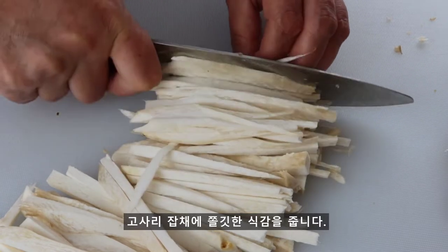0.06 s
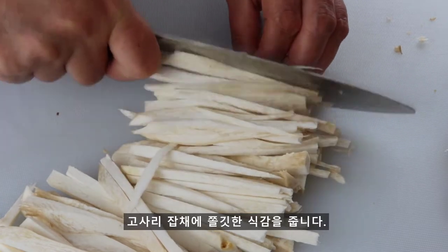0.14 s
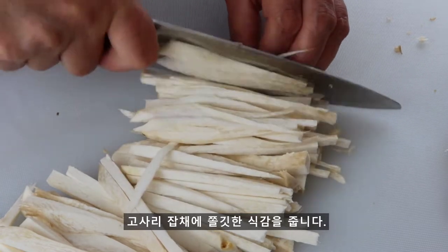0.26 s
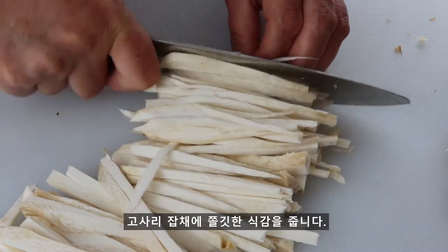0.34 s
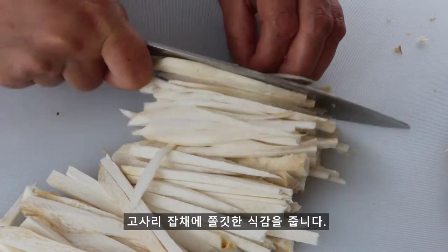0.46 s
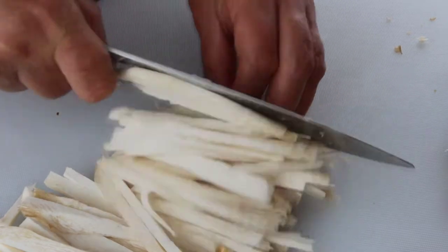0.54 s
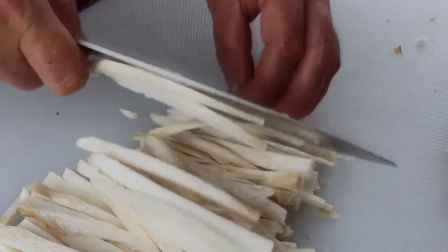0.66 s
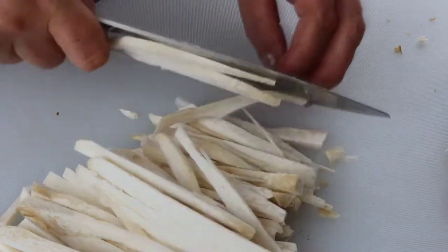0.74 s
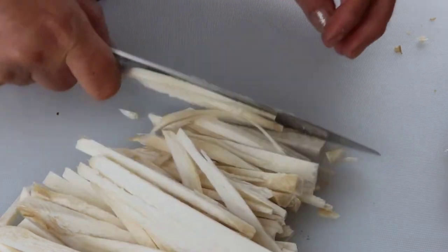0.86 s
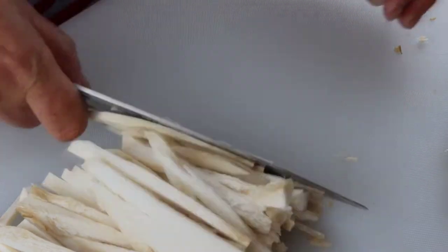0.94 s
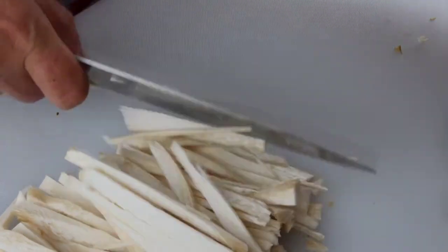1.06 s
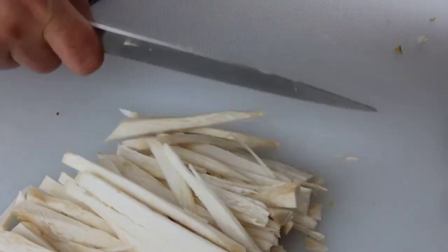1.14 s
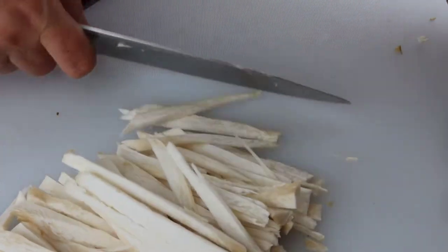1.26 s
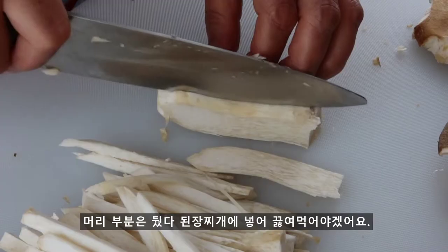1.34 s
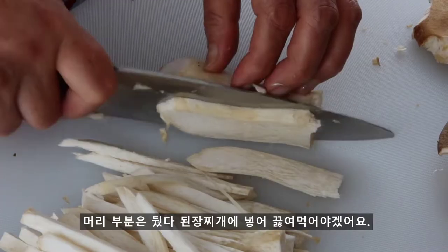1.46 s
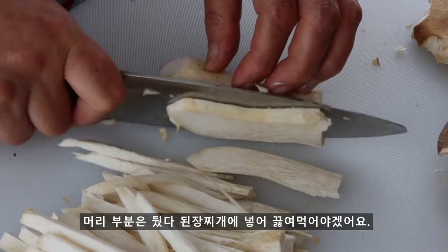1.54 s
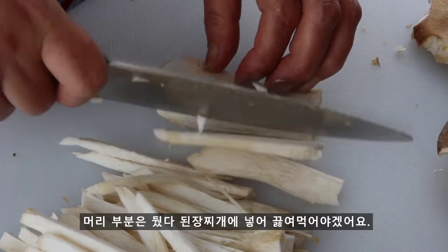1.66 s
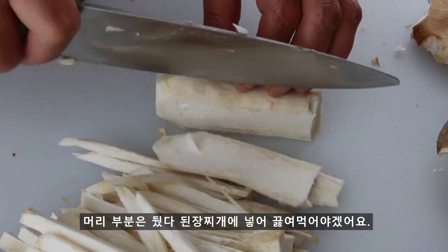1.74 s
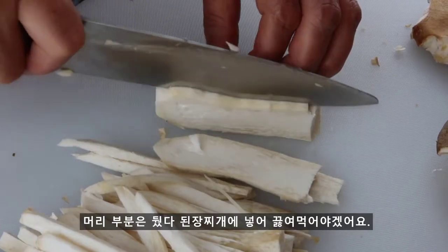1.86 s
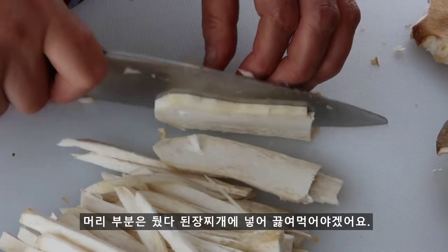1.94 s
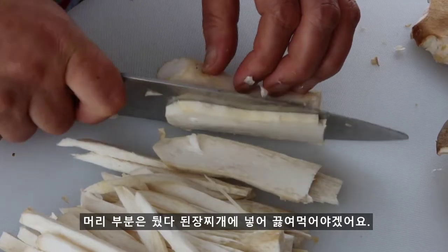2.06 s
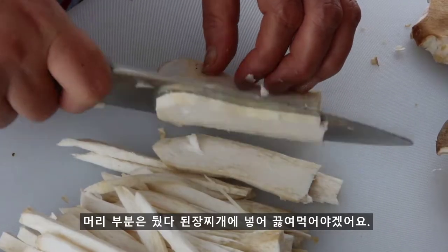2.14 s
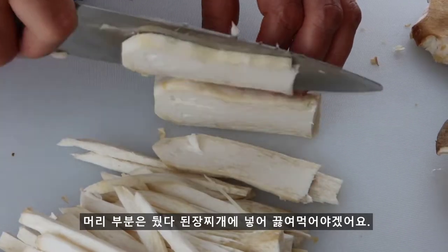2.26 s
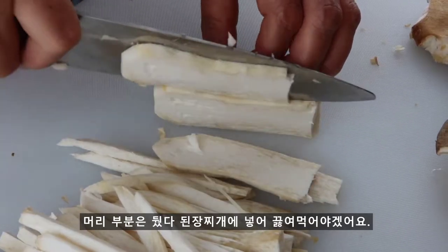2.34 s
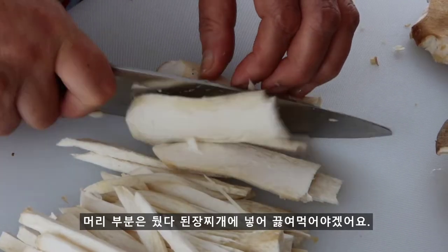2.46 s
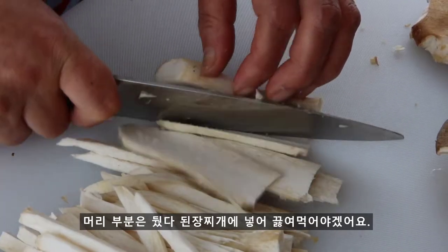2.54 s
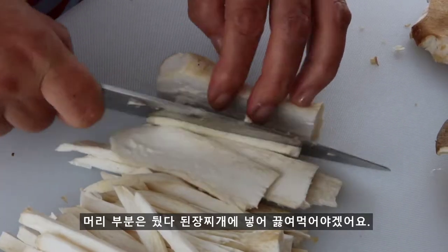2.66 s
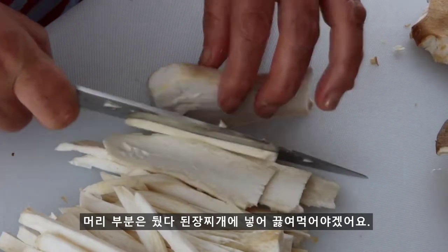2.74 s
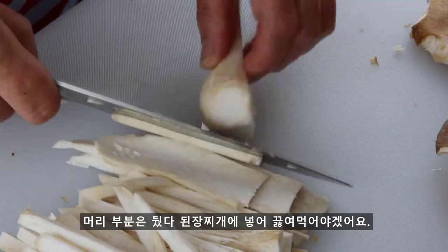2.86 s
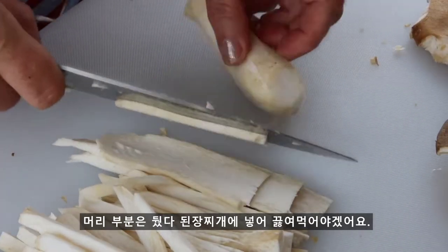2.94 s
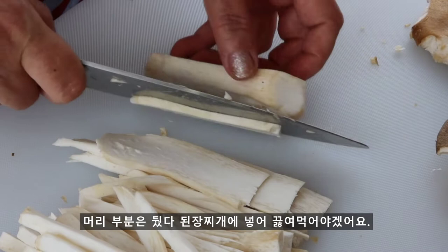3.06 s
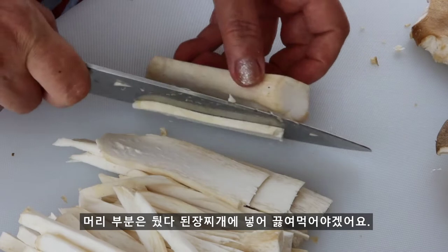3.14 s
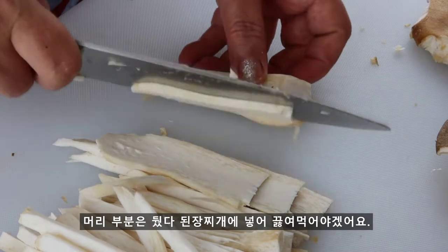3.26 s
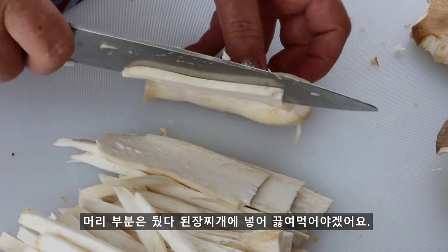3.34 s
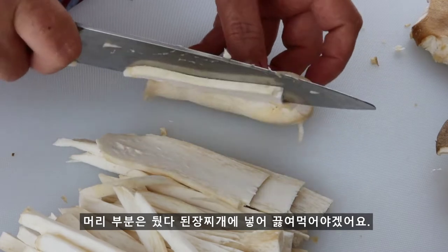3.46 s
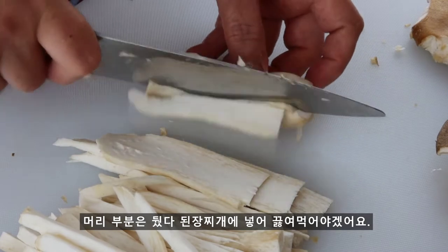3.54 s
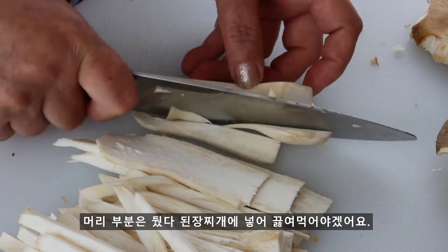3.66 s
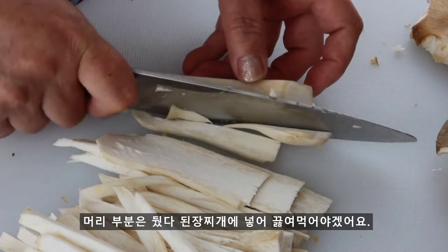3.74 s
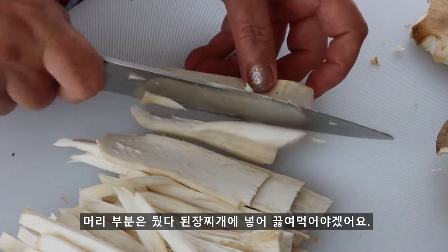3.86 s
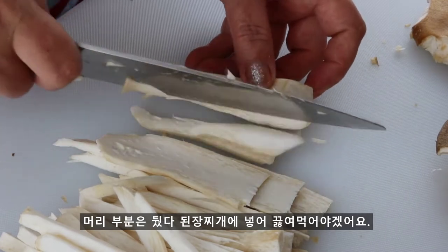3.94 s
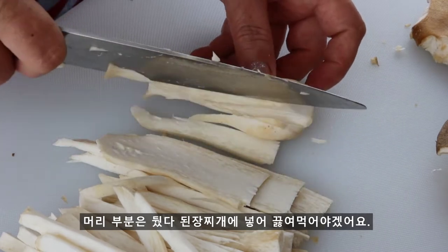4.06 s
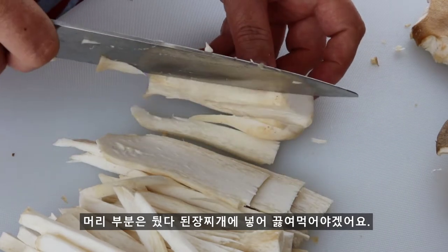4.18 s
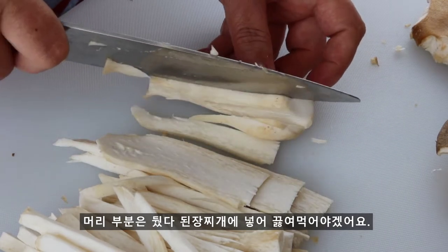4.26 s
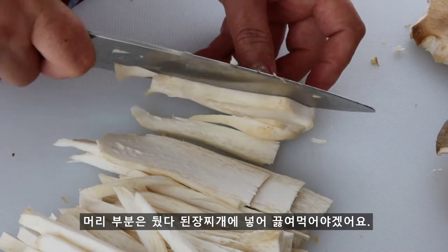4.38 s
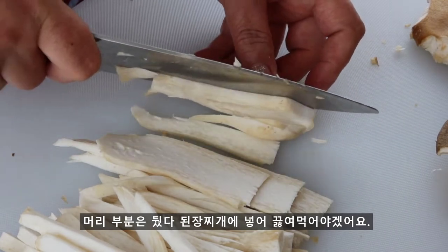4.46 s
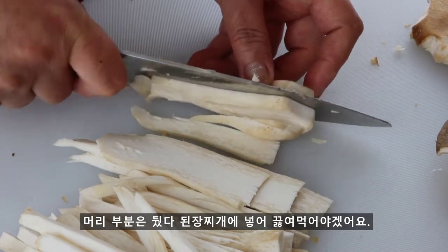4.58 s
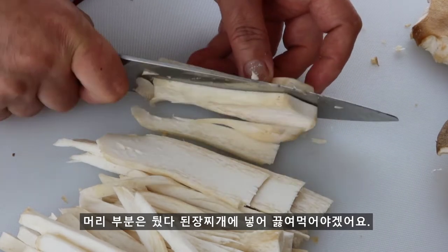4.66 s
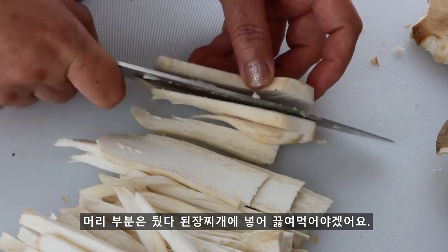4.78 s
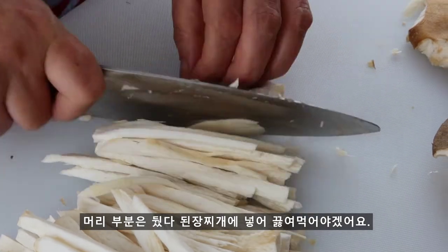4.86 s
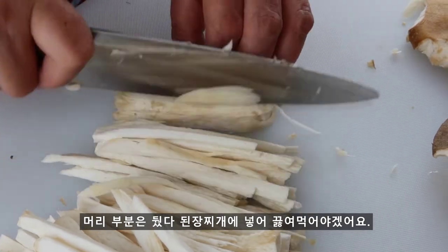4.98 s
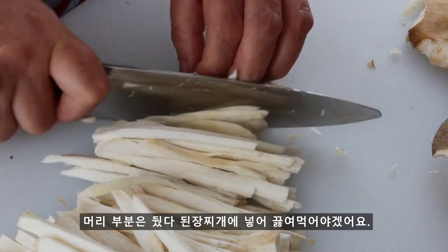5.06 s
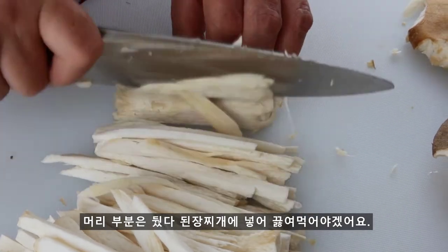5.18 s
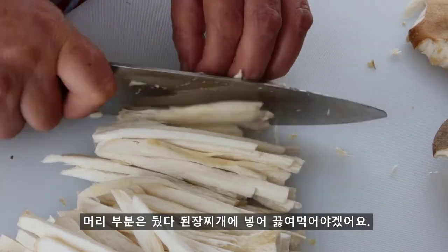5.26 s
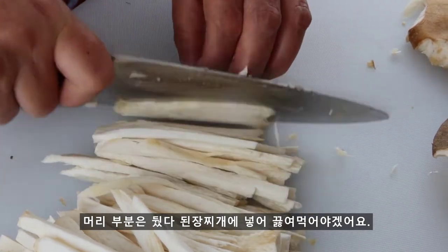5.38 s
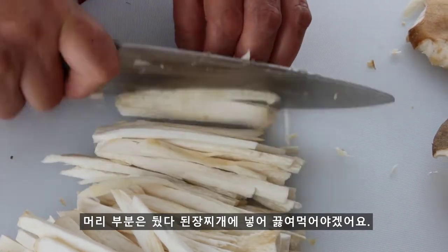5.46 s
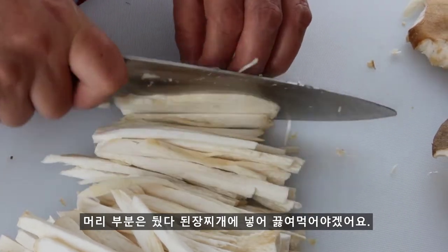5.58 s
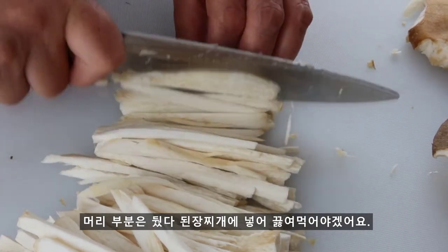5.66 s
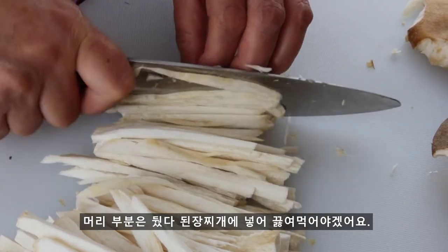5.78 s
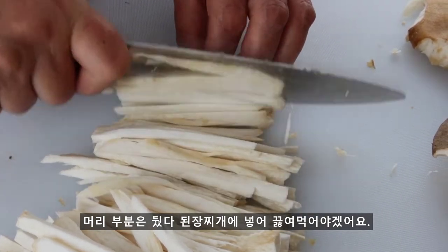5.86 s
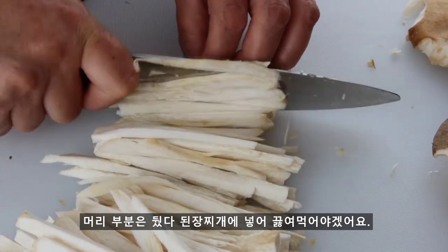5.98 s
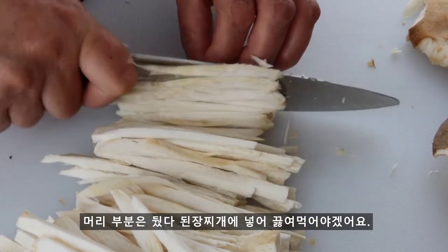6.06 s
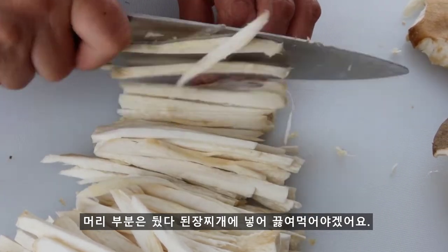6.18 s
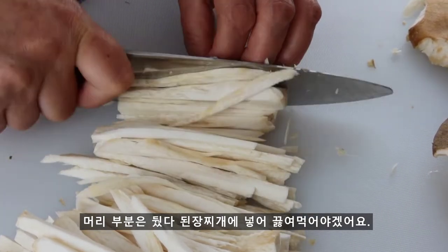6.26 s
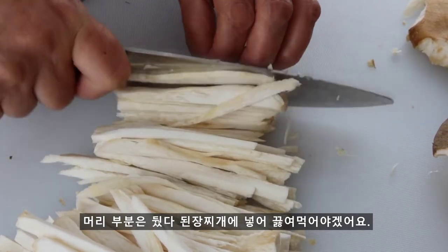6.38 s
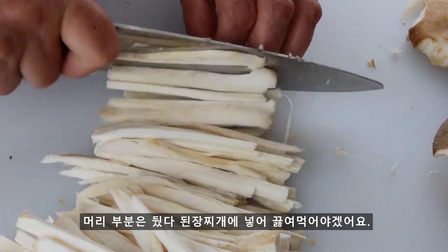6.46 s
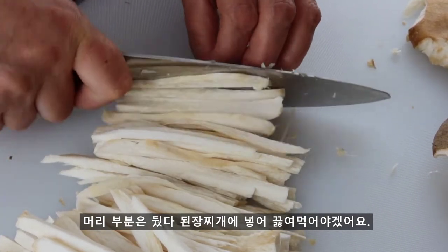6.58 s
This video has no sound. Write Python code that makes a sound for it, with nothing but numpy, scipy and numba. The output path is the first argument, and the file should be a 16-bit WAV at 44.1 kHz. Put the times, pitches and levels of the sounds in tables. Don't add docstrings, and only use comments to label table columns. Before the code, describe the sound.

Close-up mushroom slicing: uneven knife knocks, fibrous crunches, a brief steel scrape and one overloading bang, ending in brisk even chops in a hard-walled kitchen.

```python
import sys
import numpy as np
from scipy import signal
from scipy.fft import rfft, irfft
from scipy.io import wavfile
from scipy.ndimage import uniform_filter1d, minimum_filter1d
from numba import njit

SR = 44100
rng = np.random.default_rng(int(sys.argv[2]) if len(sys.argv) > 2 else 0)


def generate_wav(sig):
    pcm = np.round(np.clip(np.atleast_2d(sig).T, -1, 1) * 32767).astype(np.int16)
    wavfile.write(sys.argv[1], SR, pcm)


def boost_factor(decibels):
    exponent = np.asarray(decibels, float) / 20
    return 10 ** exponent


N = 291501


def shade(x, table):
    hz, db = np.transpose(table)
    f = np.maximum(np.arange(x.shape[-1] // 2 + 1) * SR / x.shape[-1], 1)
    return irfft(rfft(x) * boost_factor(np.interp(np.log(f), np.log(hz), db)), x.shape[-1])


def unit(x):
    return x / np.sqrt(np.mean(x ** 2))


def band(x, lo_hz, hi_hz):
    return signal.sosfilt(signal.butter(2, [lo_hz, hi_hz], "band", fs=SR, output="sos"), x)


def walk(rate_hz):
    k = int(SR / rate_hz)
    held = np.repeat(rng.standard_normal(N // k + 1), k)
    return 1.4 * uniform_filter1d(uniform_filter1d(held, k), k)[:N]


def grit(spread_db):
    return unit(rng.standard_normal(N) * boost_factor(spread_db * rng.exponential(size=N)))


def stroke(row, shape):
    start, end, db, *rel = row
    return [(start + share * (end - start), db + under, *rel) for share, under in shape]


def envelope(rows, column, top_db=0):
    rows = np.array(rows)
    db = np.minimum(rows[:, 1], top_db)
    if column > 1:
        db = db + rows[:, column]
    hold_s = .004
    times = np.r_[rows[:, 0], rows[-1, 0] + hold_s]
    gain_db = np.interp(np.arange(N) / SR, times, np.r_[db, db[-1]], left=-150, right=-150)
    return uniform_filter1d(boost_factor(gain_db), 60)


def ring(modes, contact_ms, chance, spread_ms=0.011):
    t = np.arange(4096) / SR
    hz, db, t60 = np.transpose(modes)[:, :, None]
    share = boost_factor(db + 2.5 * chance[0, :len(hz), None])
    detuned_hz = hz * (1 + .03 * chance[1, :len(hz), None])
    free = np.sum(share * np.sin(2 * np.pi * detuned_hz * t) * boost_factor(-60 * t / t60), axis=0)
    free = free * (1 - np.exp(-t * 1000 / spread_ms))
    u = t[:256] / (contact_ms / 1000)
    push = u * np.exp(-2 * u)
    out = band(np.convolve(free, push)[:len(t)], 155, 9400)
    return out / np.abs(out).max()


# f/Hz, level/dB, t60/s
BOARD_MODES = [(199.6, 0, 0.041), (279, -9, 0.11), (412, 10.5, 0.013), (524, 10, 0.028), (685, 12, 0.032),
               (837, 18, 0.014), (946, 6.5, 0.034), (1134, 1, 0.054), (1400, 2, 0.016), (1624, 3.5, 0.036),
               (1850, -1, 0.045), (1964, 3.5, 0.024)]
# f/Hz, level/dB, t60/s
EDGE_CRACK = [(1600, -3, .006), (2000, 0, .006), (2400, -2, .006), (2900, -5, .006), (3600, -10, .005)]


def knock(tick_db, crack_db, contact_ms, chance):
    burst = np.zeros((2, 4096))
    burst[0, 0] = 3
    burst[0, 1:33] = chance[2, :32] * np.exp(-np.arange(32) / 6.)
    burst[1, :1024] = chance[2] * np.exp(-np.arange(1024) / 170.)
    tick = band(burst[0], 2600, 8100)
    rattle = band(burst[1], 760, 1670)
    edge = band(ring(EDGE_CRACK, .1, chance[:, 16:]), 1300, 3300)
    crack = 1.01 * edge + boost_factor(-7) * rattle / np.abs(rattle).max()
    body = ring(BOARD_MODES, contact_ms, chance, spread_ms=0.63)
    return body + boost_factor(crack_db - 1.0) * crack + boost_factor(tick_db) * tick / np.abs(tick).max()


def blow(tick_db, crack_db, contact_ms):
    f = np.arange(1, 258) * SR / 512
    body = 1 / (1 + (f * contact_ms / 420) ** 4)
    crack = boost_factor(crack_db - 21.5) / (1 + (f / 2600 - 1500 / f) ** 2) ** 1.04
    tick = boost_factor(tick_db - 13.5) / (1 + (4000 / f) ** 2)
    return np.roll(irfft(np.sqrt(body ** 2 + crack ** 2 + tick ** 2)), 64)


# t/s, peak level/dB, crack level/dB, contact time/ms, room share/dB
CHOPS = [(0.4225, -9.5, -5, 0.49, -14), (0.9696, -14.5, 0.5, 1.24, -6.5), (1.6028, -3, -21, 0.37, -17.5),
         (2.1052, -11, -6.5, 0.42, -9.5), (2.5651, 24, 10.5, 0.2, -32.5), (3.7244, 14.5, 5, 0.27, -29),
         (4.698, -7, -11, 0.53, -11.5), (5.1715, 3, -2.5, 0.29, -22.5), (5.4062, -6, -7, 0.33, -15.5),
         (5.6473, -13, -12.5, 0.91, -5.5), (5.8634, -1, -5, 0.4, -16.5), (6.1073, 0, -2.5, 0.27, -19.5),
         (6.366, -0.5, -5, 0.28, -18)]
# t/s, peak level/dB, crack level/dB, contact time/ms, room share/dB
TAPS = [(1.8364, -33.5, 10, 0.73, -11), (2.0594, -23.5, -19, 0.31, -16), (3.0784, -35.5, -11, 2.4, -23),
        (3.1634, -33.5, -18, 2.4, -2), (3.2686, -29, -25, 2.8, -18), (3.63, -20, -20.5, 0.36, -16.5),
        (4.247, -36.5, 2, 0.22, -35), (4.6713, -22, -5, 1.7, -19), (5.7468, -24.5, -8, 0.16, -24),
        (5.826, -21.5, -17.5, 1.3, -11), (6.0824, -31.5, 8.5, 0.86, 2), (6.3448, -32.5, 7, 0.61, -3.5)]


def knocks():
    direct, send = np.zeros((2, N + 4096))
    hits = [(*r, min(-27 + 1.85 * r[2], 0)) for r in CHOPS]
    hits += [(*r, -13 + min(r[2], 0) / 2) for r in TAPS]
    hits.sort()
    chances = rng.standard_normal((len(hits), 3, 1024))
    for (s, db, crack_db, ms, room_db, tick_db), chance in zip(hits, chances):
        i = int(s * SR)
        direct[i:i + 4096] += boost_factor(db) * knock(tick_db, crack_db, ms, chance)
        send[i - 64:i + 448] += boost_factor(db + room_db + 35) * blow(tick_db, crack_db, ms)
    return direct[:N], send[:N]


# f/Hz, level/dB
CRUNCH_COLOUR = [(900, -30), (1500, 0), (3000, -3), (5500, -9), (8000, -30), (12000, -55)]
# start t/s, end t/s, crunch level/dB, body re crunch/dB, fizz re crunch/dB
CUTS = [
    (1.48, 1.61, -53, 6, -12),
    (1.97, 2.05, -55, 9, -14),
    (2.474, 2.539, -55, 7.5, -13),
    (4.603, 4.692, -56.5, 22.5, -24),
    (5.132, 5.162, -47, 11, -14),
    (5.353, 5.4, -48, 10.5, -15.5),
    (5.576, 5.634, -50.5, 7, -13),
    (6.055, 6.1, -68, 5, -14),
]
# start t/s, end t/s, crunch level/dB, body re crunch/dB, fizz re crunch/dB
TEARS = [(1.598, 1.636, -48.5, -3, -14), (2.079, 2.137, -49.5, -13, -11.5), (2.548, 2.6, -39, 11, -15),
         (3.656, 3.693, -56.5, 3, -14), (3.704, 3.719, -41, 7, -19), (4.491, 4.629, -71.5, 29, -19),
         (4.716, 4.724, -55.5, 17, -4), (5.635, 5.64, -43.5, 0, -13), (5.821, 5.862, -52.5, 13, -15),
         (6.051, 6.079, -61.5, 11.5, -22), (6.345, 6.386, -56.5, 13, -22)]
# start t/s, end t/s, crunch level/dB, body re crunch/dB, fizz re crunch/dB
SHIFTS = [
    (0.51, 0.785, -55.5, -2, -18),
    (2.94, 2.99, -66, 20, 2.5),
    (3.257, 3.309, -69.5, 18, -8),
    (3.935, 3.945, -59, 12, -10),
    (4.388, 4.423, -68, 20, -11),
    (6.24, 6.267, -68, -2, -8),
    (6.548, 6.572, -56.5, 6.5, -28),
]


def slices():
    crunch = unit(shade(grit(1.6), CRUNCH_COLOUR))
    body = unit(band(grit(1.2), 100, 830))
    fizz = unit(band(grit(2.5), 6000, 13000))
    moves = [stroke(r, [(0, -26), (.3, -6), (1, 0)]) for r in CUTS]
    moves += [stroke(r, [(0, 0), (1, 0)]) for r in TEARS]
    moves += [stroke(r, [(0, -20), (.29, 0), (.71, 0), (1, -20)]) for r in SHIFTS]
    out = np.zeros(N)
    for column, layer in enumerate([crunch, body, fizz], 1):
        gain = sum(envelope(r, column, top_db=-33) for r in moves)
        out += layer * boost_factor(1.8 * walk(120)) * gain
    return out


# start t/s, end t/s, steel level/dB, rumble re steel/dB, share of drag before its peak
SCRAPES = [
    (0.973, 1.04, -23, -5, 0.84),
    (1.716, 1.743, -36.5, 7.5, 0.82),
    (2.765, 2.908, -40.5, 9.5, 0.1),
    (5.744, 5.763, -30.5, -27, .1),
]
# f/Hz, width/Hz, level/dB
STEEL_PUSH = [(1650, 31, 0), (2030, 61, -11), (2970, 37, -16), (3380, 77, -17), (3910, 99, -18),
              (4600, 37, -22), (6590, 81, -27), (7680, 38, -21), (9020, 43, -21), (10700, 82, -35),
              (12200, 220, -48), (13100, 38, -48), (13900, 57, -45), (14800, 29, -44)]
# f/Hz, width/Hz, level/dB
STEEL_DRAG = [(1140, 28, 0), (1320, 55, -4), (1720, 41, -7), (2050, 140, -14), (2980, 42, -15),
              (3650, 55, -12), (3890, 34, -15), (4790, 130, -20), (5700, 33, -9), (10500, 51, -35)]
# f/Hz, width/Hz, level/dB
STEEL_TAP = [(837, 79, 14), (1234, 30, -5), (1820, 40, -1), (2310, 75, -3), (2870, 110, -24),
             (3930, 79, -10), (4520, 140, -1), (5200, 230, -5), (7500, 300, -24)]
# f/Hz, level/dB
RASP_COLOUR = [(500, 1), (1200, 15.5), (2200, 9.5), (4000, -3), (7000, -11), (11000, -19), (15000, -31)]


def scrapes():
    out, size = np.zeros(N), 16384
    chatter = grit(2.0) * boost_factor(2.5 * walk(200))
    rumble_colour = [(60, -69), (170, 10.5), (400, -2), (900, -13.0), (1500, -68)]
    for row, steel in zip(SCRAPES, [STEEL_PUSH, STEEL_DRAG, STEEL_DRAG, STEEL_TAP]):
        rows = stroke(row, [(0, -9), (row[4], 0), (1, -12)])
        first = int(rows[0][0] * SR) - 2048
        span = slice(first, first + size)
        rub = chatter[span]
        sing = np.zeros(size)
        for hz, width, db in steel:
            flutter_db = 2.5 * walk(70)[span]
            tone = unit(band(rub, hz - 0.62 * width, hz + 1.17 * width))
            sing += boost_factor(db + flutter_db) * tone * np.sqrt(width)
        rasp = unit(shade(rub, RASP_COLOUR))
        blade = unit(unit(sing) + boost_factor(3) * rasp)
        rumble = unit(shade(rng.standard_normal(size), rumble_colour))
        out[span] += envelope(rows, 1)[span] * blade + envelope(rows, 2)[span] * rumble
    return out


# start t/s, end t/s, level/dB
ROCKS = [
    (2.59, 2.653, -23),
    (3.735, 3.797, -45),
    (4.819, 4.852, -48.5),
    (5.185, 5.235, -47),
]
# t/s, level/dB
PINGS = [
    (2.686, -54),
]
# f/Hz, level/dB, t60/s
PING_MODE = [(6800, 0, .05)]


def rocks():
    lo_hz, hi_hz = 452, 1950
    drag = unit(band(band(grit(1.1), lo_hz, hi_hz), lo_hz / 2, 2 * hi_hz)) * boost_factor(walk(160))
    shape = [(0, -6), (.29, 0), (.8, -1.5), (1, -8)]
    out = drag * sum(envelope(stroke(r, shape), 1) for r in ROCKS)
    for s, db in PINGS:
        i = int(s * SR)
        out[i:i + 4096] += boost_factor(db) * ring(PING_MODE, .05, np.zeros((2, 1)))
    return out


# f/Hz, t60/s
WALL_DECAY = [(100, 0.16), (260, 0.32), (700, 0.26), (1840, 0.21), (4850, 0.21)]
# f/Hz, level/dB
WALL_COLOUR = [(60, -3), (150, 11), (300, 9.5), (550, 11.5), (900, 14.5), (1300, 9), (2000, 10.5),
               (4500, 1), (10000, -18.5)]
# f/Hz, side re mid/dB
WALL_SIDE = [(100, -29.5), (500, -20), (1500, -16.5), (4000, -6), (10000, 12.5)]
# f/Hz, width/Hz, level/dB
COUNTER = [(845, 67, -6), (1239, 77, -2.5)]


def walls():
    t = np.arange(1 << 15) / SR
    wall_hz, wall_t60 = np.transpose(WALL_DECAY)
    out = 0
    for hz in 45 * 2 ** np.arange(0, 8.6, .5):
        t60 = np.interp(np.log(hz), np.log(wall_hz), wall_t60)
        decay = boost_factor(-60 * t / t60) + boost_factor(-77.0) * boost_factor(-60 * t / 0.315)
        out = out + band(rng.standard_normal((2, len(t))), hz / 1.183, hz * 1.173) * decay
    build_up = 1 - np.exp(-(t / 0.0041) ** 2)
    out = shade(out * build_up, WALL_COLOUR)
    out = out + sum(boost_factor(db) * band(out, hz - w / 2, hz + w / 2) for hz, w, db in COUNTER)
    return np.array([out[0], shade(out[1], WALL_SIDE)]) / np.sqrt(np.sum(out[0] ** 2))


# t/s, peak level/dB, click level/dB, crack level/dB
CHANGES = [
    (0.1026, -11, -55, -9),
    (4.823, -24, -12, 3),
    (4.9045, -11, -11.5, 1.5),
]


def scene_changes(echo):
    out = np.zeros((2, N))
    for s, db, click_db, crack_db in CHANGES:
        tail = signal.fftconvolve(blow(-37, crack_db, 0.31)[None], echo)[:, int(.014 * SR):20000]
        fade_in = np.minimum(np.arange(tail.shape[1]) / 60., 1)
        tail = tail / np.abs(tail[0]).max() * fade_in
        tail[0, 0] += boost_factor(click_db)
        i = int(s * SR)
        out[:, i:i + tail.shape[1]] += boost_factor(db) * tail
    return out


# f/Hz, level/dB per Hz
HUM_COLOUR = [(12, -34), (20, -13.5), (77, -4.5), (134, -11), (168, -2.5), (204, -10), (337, -13.5),
              (513, -19.5), (825, -20.5), (1290, -24), (1480, -25.5), (1860, -26), (2530, -28.5),
              (4810, -33.5), (16000, -56.5)]
# f/Hz, side re mid/dB
HUM_SIDE = [(60, -14), (110, -21), (200, -7), (380, 0), (700, -3), (1290, -2.5), (2380, -3.5), (4400, -4.5),
            (8120, -4.5), (15000, -2.5)]


def hum():
    colour = HUM_COLOUR[:-1] + [(12000, -48.5), (15000, -59), (16000, -73)]
    mid, side = shade(rng.standard_normal((2, N)), colour)
    gain = boost_factor(-48) / np.sqrt(np.mean(mid ** 2))
    bass = band(mid, 38, 280)
    waver = boost_factor(2.2 * walk(9))
    return gain * np.array([mid + (waver - 1) * bass, shade(side, [(25, -37.5)] + HUM_SIDE)])


def scene():
    direct, send = knocks()
    rubbing = slices() + scrapes() + rocks()
    near = direct + rubbing
    echo = walls()
    reverb = signal.fftconvolve((send + boost_factor(-21.0) * rubbing)[None], echo)[:, :N]
    wet = reverb + scene_changes(echo) + hum()
    mid = wet[0] + near
    side = wet[1] + .55 * np.gradient(near)
    return np.array([mid + side, mid - side])


@njit
def follow(x, attack, release):
    e, out = 0., np.empty(len(x))
    for i in range(len(x)):
        e += (x[i] - e) * (attack if x[i] > e else release)
        out[i] = e
    return out


def top_cut(x):
    return signal.sosfilt(signal.butter(12, 16520, fs=SR, output="sos"), x)


def record(dry):
    attack_s, release_s, limit_db, ratio = 0.0048, 0.026, -12.5, 2.33
    level = follow(np.abs(dry).max(axis=0), 1 / (attack_s * SR), 1 / (release_s * SR))
    x = dry * np.minimum(boost_factor(limit_db) / (level + 1e-9), 1) ** (1 - 1 / ratio)
    look = int(.0008 * SR)
    need = np.minimum(boost_factor(1) / (np.abs(x).max(axis=0) + 1e-9), 1)
    need = minimum_filter1d(need, 2 * look + 1)
    x = x * uniform_filter1d(uniform_filter1d(need, look), look)
    x = x / (1 + np.abs(x / .92) ** 8) ** (1 / 8)
    return top_cut(x)


dry = scene()
out = record(dry)
generate_wav(out)
```